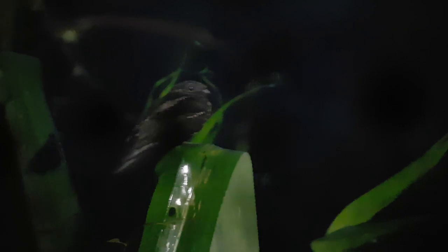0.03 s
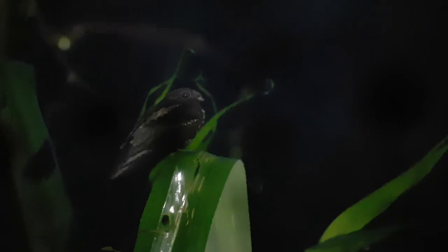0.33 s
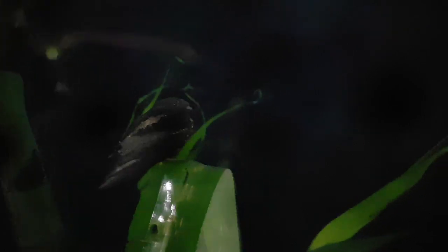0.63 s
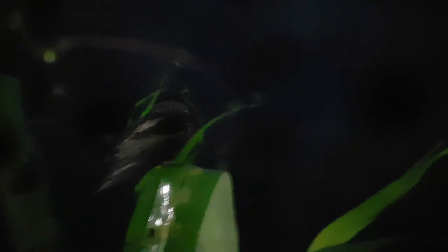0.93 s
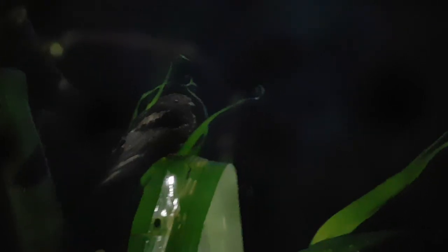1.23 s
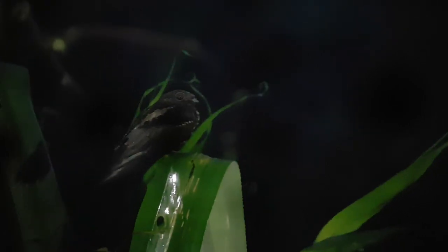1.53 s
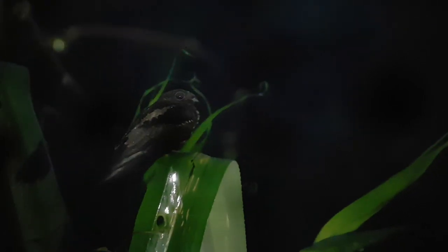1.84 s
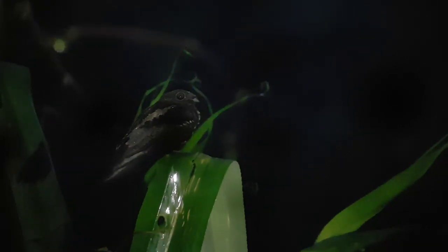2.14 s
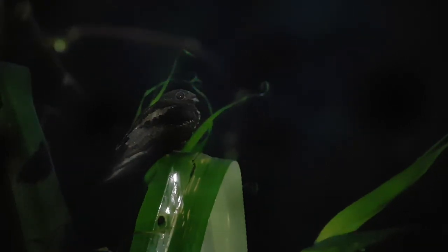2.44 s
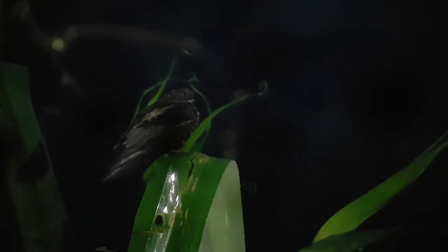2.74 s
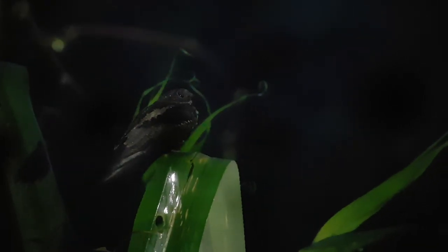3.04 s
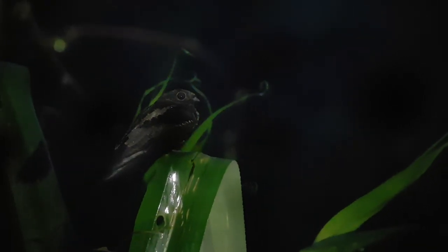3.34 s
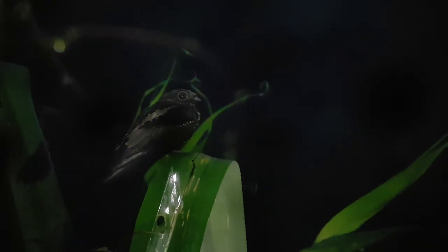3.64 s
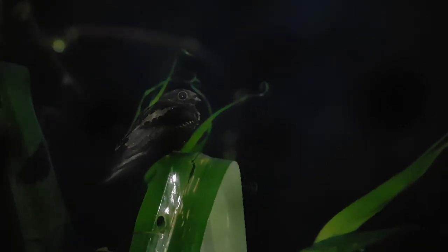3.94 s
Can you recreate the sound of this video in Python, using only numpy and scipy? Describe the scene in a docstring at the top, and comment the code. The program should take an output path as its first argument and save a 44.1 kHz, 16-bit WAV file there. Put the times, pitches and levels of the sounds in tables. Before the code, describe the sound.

Quick, trilling frog chirps repeat in a forest at night, pausing briefly near the end. Around them are very high katydid ticks, pulsing crickets, faint croaks and a soft forest hiss, with a few dull taps in the second half.

```python
"""A forest at night. Small frogs trade short rising chirps, each a rough trill and then a whistle, over a
far chorus and a few hoarse croaks. A katydid ticks very high on the right, one ring per wing stroke.
Two kinds of crickets throb further off. Trees scatter the chirps and ticks. Behind it all: a soft wash of
distant forest, a faint hum, a brief low rumble at the start and four soft knocks in the second half."""
import sys
import numpy as np
from scipy import signal
from scipy.fft import rfft, irfft
from scipy.io import wavfile
from scipy.ndimage import uniform_filter1d

SR = 44100
rng = np.random.default_rng(int(sys.argv[2]) if len(sys.argv) > 2 else 0)


def transcribe(signal):
    """Save signal, clipped to [-1, 1], as a 16-bit WAV file at the path in sys.argv[1]."""
    frames = np.atleast_2d(signal).T
    limited = np.clip(frames, -1, 1)
    pcm = np.round(limited * 32767).astype(np.int16)
    wavfile.write(sys.argv[1], SR, pcm)


N = 176400
T = np.arange(N) / SR
FREQ_HZ = np.fft.rfftfreq(N, 1 / SR)


def amp(db):
    """Decibels to gain."""
    return 10 ** (np.asarray(db) / 20)


def pan(db):
    """Stereo gains for a left-minus-right level."""
    return amp(np.array([[db], [-db]]) / 2)


def unit(x):
    """Scale to rms 1."""
    return x / np.sqrt(np.mean(x ** 2))


def curve(points):
    """Level in dB over time, through (s, dB) points."""
    return np.interp(T, *np.array(points).T)


def colour(x, points):
    """Filter by (Hz, dB) points."""
    hz, db = np.array(points).T
    gain = amp(np.interp(np.log(FREQ_HZ + 1), np.log(hz), db))
    return irfft(rfft(x) * gain, N)


def noise(points, likeness=0):
    """Coloured stereo noise, rms 1; likeness is the share of bass power common to both ears."""
    white = rng.standard_normal((2, N))
    if likeness:
        share = likeness / (1 + (FREQ_HZ / 450) ** 4)
        common = rfft(rng.standard_normal(N))
        white = irfft(rfft(white) * np.sqrt(1 - share) + common * np.sqrt(share), N)
    return unit(colour(white, points))


def walk(rate_hz):
    """Smooth random drift, rms 1."""
    hold = int(SR / rate_hz)
    steps = np.repeat(rng.standard_normal(N // hold + 2), hold)
    return unit(uniform_filter1d(steps, hold)[:N])


def trees(x, t60_s, build_s):
    """Diffuse echo from trunks and leaves, different in each ear."""
    t = T[:SR]
    tail = rng.standard_normal((2, SR)) * amp(-60 * t / t60_s) * (1 - np.exp(-t / build_s))
    tail /= np.sqrt(np.sum(tail ** 2, axis=1, keepdims=True))
    return signal.fftconvolve(x[None], tail, axes=1)[:, :N]


def forest_wash():
    """Distant forest: broad, slightly wavering noise."""
    # Each row: frequency in Hz, relative density in dB.
    spectrum = [(25, -16), (60, -25.5), (130, -15.5), (260, -9), (400, 0), (560, 0.5), (950, -1), (1400, 1),
                (2200, -0.5), (2900, -1.5), (3400, -7), (4500, -1), (5400, -16.5), (6400, -19.5),
                (8300, -20), (9500, -33.5), (10700, -21.5), (12200, -15.5), (15300, -13), (16500, -44)]
    return amp(-50 + 0.9 * walk(4.89)) * noise(spectrum, likeness=0.67) * pan(-2.5)


def hum():
    """A faint, drifting tone on the right."""
    # Each row: time in seconds, level in dB.
    levels = [(0, -79.5), (.35, -70.5), (.6, -91), (1.6, -85), (2.2, -76.5), (3, -76.5), (4, -73.5)]
    pitch_hz = 189.8 + 0.85 * walk(4.63)
    return amp(curve(levels)) * unit(np.sin(2 * np.pi * np.cumsum(pitch_hz) / SR)) * pan(-18.5)


def rumble():
    """Low noise that swells early and dies away."""
    # Each row: time in seconds, level in dB.
    levels = [(.07, -67), (.2, -65.5), (.3, -58.5), (.38, -66.5), (.5, -72), (1, -89.5), (4, -98)]
    bass = noise([(20, -22), (50, 0), (100, 3), (200, 0), (400, -19), (1500, -62)], likeness=0.81)
    return amp(curve(levels)) * bass


def knocks(decay_s=0.011):
    """Dull, quickly damped taps, like drops on leaves."""
    # Each row: start in seconds, level in dB, pitch in Hz.
    taps = [(2.574, -49, 1080), (3.243, -57, 220), (3.352, -52, 600), (3.465, -45, 620)]
    out = np.zeros((2, N))
    for start, db, hz in taps:
        age = np.maximum(T - start, 0)
        spectrum = [(hz / 4, -25), (hz * 0.78, -4), (hz, 0), (hz * 1.6, -9), (hz * 2, -16), (hz * 6, -45)]
        env = np.clip(age / 0.001, 0, 1) * np.exp(-age / decay_s)
        out += amp(db) * env * noise(spectrum, likeness=0.8)
    return out


def throb(rate_hz, peak_s, depth):
    """Regular swells of a chirp train, softened by distance."""
    return 1 + depth * np.cos(2 * np.pi * rate_hz * (T - peak_s))


def throbbing_crickets():
    """Two songs that drift in and out of step."""
    # Each row: chirp rate in Hz, time of one chirp in seconds, level in dB.
    singers = [(8.31, 0.11, -59.5), (6.3, 0.15, -60)]
    # Each row: frequency in Hz, relative level in dB.
    song = [(3000, -67), (3600, -6.5), (3900, 5.5), (4250, 3), (4480, 1.5), (4750, -2.5), (5050, -22.5),
            (6000, -39)]
    return pan(-2.8) * sum(amp(db + 0.78 * walk(6.1)) * throb(rate_hz, peak_s, depth=0.55) * noise(song)
                           for rate_hz, peak_s, db in singers)


def buzzing_cricket(stroke_hz=56.6):
    """A higher song: fast wing strokes in slower phrases."""
    # Each row: frequency in Hz, relative level in dB.
    song = [(5800, -29), (6800, -4.5), (7300, 0), (7650, -2.5), (8100, 5.5), (8450, 1), (8900, -15),
            (9600, -37)]
    # Each row: time in seconds, level in dB.
    levels = [(0, -68), (1, -65), (2.2, -65.5), (2.8, -63.5), (3.3, -65), (4, -63)]
    strokes = 1 + 0.37 * np.cos(2 * np.pi * np.cumsum(stroke_hz * (1 + 0.028 * walk(8.47))) / SR)
    phrases = amp(curve(levels) + 0.83 * walk(6.62)) * throb(rate_hz=4.13, peak_s=0.14, depth=0.23)
    return phrases * strokes * noise(song) * pan(-3.5)


def frog_chorus():
    """Frogs so far off that their chirps blur together."""
    # Each row: time in seconds, level in dB.
    levels = [(0, -55.5), (.9, -50), (1.1, -57.5), (1.45, -56), (1.7, -53.5), (2.25, -52), (2.45, -62.5),
              (3.7, -83), (3.9, -55), (4, -57)]
    voices = noise([(2100, -25.5), (2550, -6), (2800, -0.5), (3080, -2), (3400, -39), (5000, -84)])
    return amp(curve(levels) + 1.16 * walk(15)) * voices * pan(-2)


def croaks(pitch_hz=1326, half_band_hz=150, length_s=0.062):
    """Low, hoarse calls, blurred by distance."""
    # Each row: start in seconds, relative level in dB.
    calls = [(1.36, -57), (1.76, -57.5), (1.88, -56), (2.05, -55.5), (2.2, -59), (2.34, -55.5), (2.53, -55),
             (2.8, -54), (3.84, -68)]
    env = sum(amp(db + 2.5) * np.exp(-(2 * (T - start) / length_s - 1) ** 2) for start, db in calls)
    voice = noise([(pitch_hz / 2, -40), (pitch_hz - half_band_hz, 0),
                   (pitch_hz + half_band_hz, 0), (pitch_hz * 1.58, -30)])
    return env * voice * pan(-7.5)


def katydid(ring_hz=13760, width_s=0.00013, rise_s=0.0012, left_lag_s=0.00042, leaf_decay_s=0.0022):
    """Each wing stroke is one very short ring, right ear first, then scattered by leaves and trunks."""
    # Each row: start in seconds, relative peak in dB.
    strokes = [(0.122, -33), (0.1786, -32.5), (0.2244, -33.5), (0.2698, -34), (0.3162, -31.5), (0.36, -36),
               (0.404, -35), (0.4529, -32.5), (0.4993, -31.5), (0.5462, -32.5), (0.5905, -32.5),
               (0.635, -32.5), (0.6783, -32.5), (0.734, -32), (0.7777, -30.5), (0.8225, -29.5),
               (0.8697, -30.5), (0.917, -29.5), (1.0605, -31.5), (1.1086, -32), (1.1757, -35.5),
               (1.298, -32), (1.3463, -32), (1.3905, -33.5), (1.4408, -34), (1.6087, -32), (1.6511, -30.5),
               (1.7017, -30.5), (1.7845, -32), (1.8297, -31.5), (1.8746, -31.5), (1.925, -32),
               (1.9722, -31), (2.0228, -30), (2.0707, -30.5), (2.1181, -31.5), (2.1645, -31.5),
               (2.2074, -31.5), (2.253, -33), (2.2957, -32.5), (2.3436, -34), (2.3905, -32), (2.44, -33),
               (2.4853, -32.5), (2.5301, -32), (2.575, -32.5), (2.6219, -32), (2.6703, -32), (2.7157, -31),
               (2.76, -32.5), (2.8055, -33), (2.8538, -31.5), (2.8983, -32), (2.945, -33), (2.9864, -36.5),
               (3.0322, -34), (3.1892, -33), (3.238, -33.5), (3.2874, -34.5), (3.3747, -33), (3.5324, -33),
               (3.5765, -33), (3.625, -33), (3.713, -33), (3.7604, -34), (3.8047, -34), (3.853, -33),
               (3.903, -34), (3.9474, -34), (3.9944, -34)]
    # Each row: frequency in Hz, echo gain in dB.
    echo_colour = [(9000, -29), (10800, 1), (12000, 4), (13800, -9.5), (15400, 10.5), (16300, -47.5)]
    ticks, leaf_env = np.zeros((2, N)), np.zeros((2, N))
    for (start, db), (detune, stretch) in zip(strokes, rng.standard_normal((len(strokes), 2))):
        at = np.abs(T - start) < 0.02
        t = T[at] - start - rise_s - np.array([[left_lag_s], [0]])
        ring = np.cos(2 * np.pi * ring_hz * (1 + 0.0052 * detune) * t)
        env = np.exp(-0.5 * (t / (width_s * np.exp(0.058 * stretch))) ** 2)
        ticks[:, at] += amp(db + 4) * env * ring
        leaf_env[:, at] += amp(db - 9.5) * (t > 0) * np.exp(-np.abs(t) / leaf_decay_s)
    leaves = leaf_env * noise([(9000, -24), (10800, -6), (12200, 12), (15300, 9), (16800, -12)])
    flicker = amp(-3 + 2.9 * walk(300))
    trunks = flicker * colour(trees(ticks[1], t60_s=0.14, build_s=0.00057), echo_colour)
    return ticks * pan(-6.5) + leaves * pan(3) + trunks * pan(0.2)


def frog_chirps(trill_hz=244.7, trill_depth=0.68, right_lag_s=0.00037):
    """A rough rising trill, a tiny break, a higher whistle; a weak partial lies an octave below."""
    # Each row: start in seconds, relative level in dB, top pitch in Hz, length in seconds,
    # direct-path gain in dB, left-minus-right pan in dB, roughness factor.
    chirps = [(.088, -50, 2950, 0.049, -3, 0, .3), (0.211, -40, 3133, .047, -0.5, -4, 0.85),
              (0.375, -38, 3136, .048, -7, 4, 1.2), (.547, -39, 3164, .047, 2, -4, 1),
              (0.713, -38.5, 3150, 0.044, 4, -3, .8), (.884, -38, 3160, .048, 0, -3, 1),
              (1.095, -47.5, 2906, 0.059, -2, -2, 0.35), (1.257, -53, 2950, 0.054, -2, -5, 0.4),
              (1.423, -51, 2920, .064, 0.5, -1, 0.48), (1.524, -43, 3200, 0.04, -10, -12, 1),
              (1.586, -54, 2926, 0.059, -1, 2, .3), (1.668, -46, 3270, 0.05, -9, -15, 1),
              (1.81, -45.5, 3213, 0.042, -4, -12, 1), (1.891, -54, 2980, 0.06, -7, -9, 0.5),
              (1.956, -44.5, 3190, 0.047, -3.5, -7, 1.14), (2.053, -51.5, 2950, 0.054, -3, -13, 0.36),
              (2.104, -46.5, 3210, .046, -7, -9, 0.93), (2.187, -48.5, 3053, .06, -2.5, -4, .5),
              (2.345, -44.5, 3097, 0.049, -4, -7, 0.95), (2.506, -43, 3040, .054, -3.5, -5, 1.02),
              (2.66, -43.5, 3090, .058, -3.5, -8, 1.07), (2.824, -45.5, 3063, 0.055, -2, -4, 1.1),
              (3.001, -44.5, 3066, 0.044, -1.5, 0.5, 0.97), (3.163, -45, 3060, 0.043, -2, -1, 1),
              (3.828, -51, 3020, .058, 1.5, -3, 0.57), (3.947, -56, 3050, .05, -3, 0, 1.05)]
    # Each row: frequency in Hz, echo gain in dB.
    echo_colour = [(1400, -1), (2400, 2), (2800, 2.5), (3000, -1), (3200, -6), (3600, -6)]
    rise, whistle_jump = 0.1093, 0.05044  # shares of the top pitch
    break_at = 0.655  # share of the length
    direct, to_trees = np.zeros((2, N)), np.zeros(N)
    waver, flutter, uneven, scatter = walk(800), walk(120), walk(250), walk(400)
    break_shifts = 0.005 * rng.standard_normal(len(chirps))
    for (start, db, top_hz, length_s, direct_db, pan_db, rough), shift in zip(chirps, break_shifts):
        at = (T >= start) & (T < start + length_s)
        progress = (T[at] - start) / length_s
        past_break = progress - break_at - shift
        trilling = np.clip(0.5 - past_break * 20, 0, 1)  # 1 in the trill, 0 in the whistle
        below_top = rise * (1 - progress) ** 1.298 + whistle_jump * trilling
        jitter = 1 + rough * waver[at] * (0.01 + 0.026 * trilling)
        phase = 2 * np.pi * np.cumsum(top_hz * (1 - below_top) * jitter) / SR
        tone = np.sin(phase) + amp(-15.5) * np.sin(phase / 2)
        pulse = np.cos(2 * np.pi * np.cumsum(trill_hz * (1 + 0.071 * flutter[at])) / SR)
        trill = 1 + rough * trill_depth * np.maximum(trilling, 0.3) * pulse
        env = np.clip(progress / 0.23, 0, 1) * np.clip((1 - progress) / 0.058, 0, 1)
        gap = 1 - np.exp(-(past_break / 0.018) ** 2)
        level_db = db - 0.5 - 2 * trilling + 0.79 * uneven[at]
        call = amp(level_db) * env * gap * trill * tone
        direct[:, at] += call * amp(direct_db) * pan(pan_db)
        to_trees[at] += call * (1 + 0.5 * scatter[at])
    direct[1] = np.interp(T - right_lag_s, T, direct[1])
    echo = trees(to_trees, t60_s=0.25, build_s=0.00067)
    echo += amp(-10) * trees(to_trees, t60_s=1.0, build_s=0.013)
    return direct + amp(-1) * colour(echo, echo_colour) * pan(-4.5)


def scene():
    """All voices of the night, in stereo."""
    frogs = frog_chirps() + frog_chorus() + croaks()
    insects = katydid() + throbbing_crickets() + buzzing_cricket()
    return frogs + insects + knocks() + forest_wash() + hum() + rumble()


def record(dry):
    """The sound cuts in just after the start; a steep low-pass removes the very top."""
    start_s, top_hz = 0.069, 16900
    gate = np.clip((T - start_s) / 0.001, 0.003, 1)
    lowpass = signal.ellip(10, 0.1, 70, top_hz, fs=SR, output="sos")
    return signal.sosfilt(lowpass, dry * gate)


dry = scene()
out = record(dry)
transcribe(out)
```